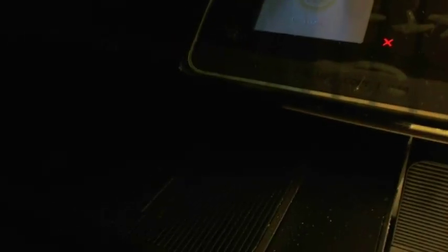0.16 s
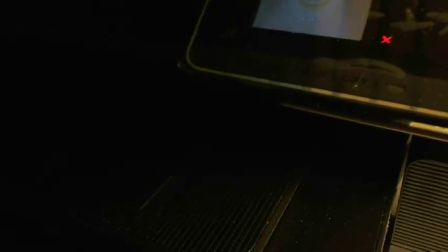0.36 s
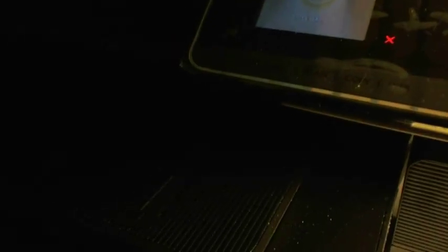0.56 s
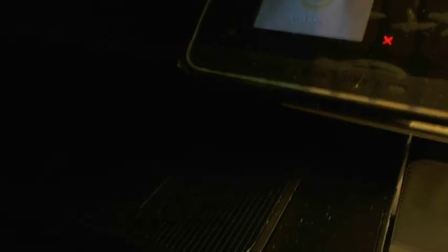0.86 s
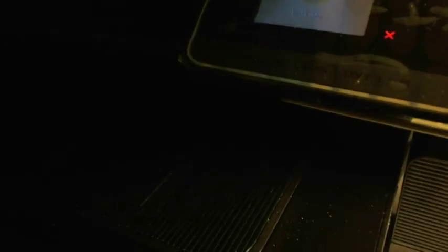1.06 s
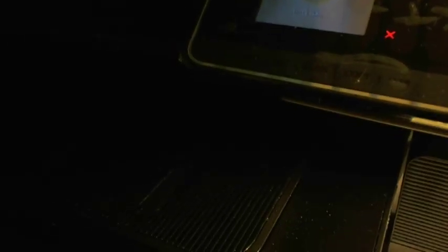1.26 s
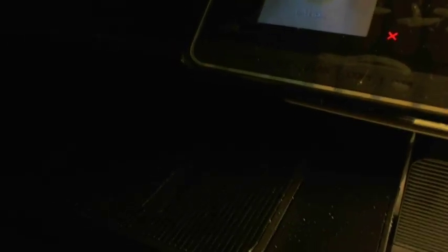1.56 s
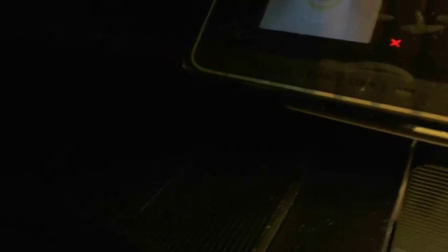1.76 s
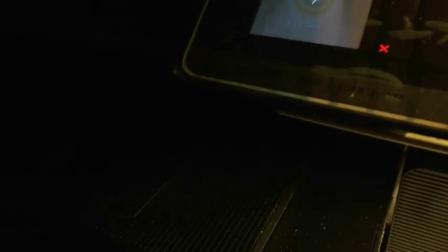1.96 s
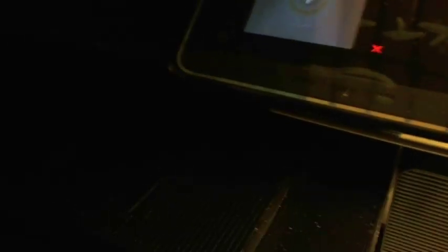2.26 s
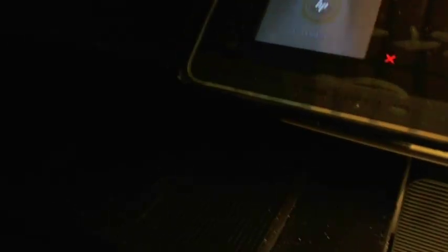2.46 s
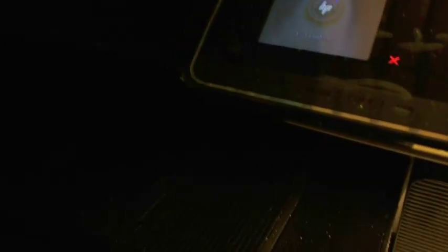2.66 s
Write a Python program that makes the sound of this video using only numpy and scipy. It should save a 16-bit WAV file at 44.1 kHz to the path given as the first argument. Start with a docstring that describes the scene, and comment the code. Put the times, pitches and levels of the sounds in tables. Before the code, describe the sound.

Printer carriage clacks hollowly every three quarters of a second above a steady hum that swells late

```python
"""An inkjet printer in a quiet room, through a narrow-band camera microphone. From the start a motor hums with thin
overtones over the soft rush of the mechanism, and a thin squeal steps up in pitch, gone by 1 s. Ticks near 0.1, 0.8,
1.6 and 2.3 s each lead to a rattling clack of the plastic body some 0.1 to 0.2 s later; sliding noise peaks near 1 s
and a looser part buzzes on. After 2 s the hum swells with its rumble; a short hiss sinks in pitch near 2.7 s.
Sines make the tones, filtered noise the rushes, and random touches and ringing modes the hits."""
import sys
import numpy as np
from scipy import signal
from scipy.fft import rfft, irfft, next_fast_len
from scipy.io import wavfile
from scipy.ndimage import uniform_filter1d, map_coordinates

SR = 44100
rng = np.random.default_rng(int(sys.argv[2]) if len(sys.argv) > 2 else 0)


def persist_wave(psi):
    """Save psi, clipped to +-1, as 16-bit WAV."""
    counts = np.round(np.clip(psi, -1, 1) * 32767).astype(np.int16)
    wavfile.write(sys.argv[1], SR, np.atleast_2d(counts).T)


def voltage_ratio(decibels):
    """Convert decibels (scalar or array-like) to amplitude ratios, 20 dB per decade."""
    exponent = np.asarray(decibels, float) / 20
    return 10 ** exponent


N = 123479


def unit(x):
    """Scale to rms 1."""
    return x / np.sqrt(np.mean(x ** 2) + 1e-20)


def along(points, hz):
    """Read (Hz, value) points on a log frequency axis."""
    point_hz, value = np.transpose(points)
    return np.interp(np.log(hz + 1), np.log(point_hz + 1), value)


def curves(rows):
    """One value per sample for each column after the time."""
    time_s, *columns = np.transpose(rows)
    return [np.interp(np.arange(N) / SR, time_s, column) for column in columns]


def wobble(knots_per_s):
    """A smooth random curve through normal random knots."""
    knots = rng.standard_normal(int(N * knots_per_s / SR) + 4)
    return map_coordinates(knots, [np.arange(N) * knots_per_s / SR])


def filtered(x, response):
    """x times a complex response of frequency."""
    m = next_fast_len(N + SR // 2)
    return irfft(rfft(x, m) * response(np.fft.rfftfreq(m, 1 / SR)), m)[..., :N]


def resonant(x, modes):
    """Parallel resonances of alternating sign, scaled so that white noise of rms 1 stays at rms 1."""
    def response(f):
        total = 0
        for k, (centre, width, db) in enumerate(modes):
            damping = 1j * f * width
            total = total + (-1) ** k * voltage_ratio(db) * damping / (centre ** 2 - f ** 2 + damping + 1e-9)
        return total / np.sqrt(np.mean(np.abs(total) ** 2))
    return filtered(x, response)


def swell(start_s, rise_s, hold_s, t60_s):
    """Envelope: straight rise, hold, exponential fall."""
    t = np.arange(N) / SR - start_s
    fall_s = np.clip(t - rise_s - hold_s, 0, None)
    return np.clip(t / rise_s, 0, 1) * voltage_ratio(-60 * fall_s / t60_s)


def patchy_noise(spectrum, patchy_db):
    """Coloured noise of rms 1 with time-frequency patches of random gain."""
    z = signal.stft(rng.standard_normal(N), nperseg=512)[2]
    field = uniform_filter1d(rng.standard_normal(z.shape), 5, 0)
    field = uniform_filter1d(field, 10, 1)
    noise = signal.istft(z * voltage_ratio(patchy_db * unit(field)), nperseg=512)[1][:N]
    return unit(filtered(noise, lambda hz: voltage_ratio(along(spectrum, hz))))


def narrow(phase, width_hz):
    """Narrow noise of rms 1 around a moving pitch."""
    return unit(wobble(width_hz) * np.sin(phase) + wobble(width_hz) * np.cos(phase))


CONTACTS_PER_S, RATTLES_PER_S, CONTACT_SPREAD_DB = 1500, 5000, 4


def contacts(per_s):
    """Dense random touches of uneven size and either sign, rms 1."""
    touch = rng.random(N) < per_s / SR
    size = voltage_ratio(CONTACT_SPREAD_DB * rng.standard_normal(N))
    return unit(touch * size * rng.choice([-1, 1], N))


def ring(events, modes, rise_s):
    """Single blows ring a set of decaying modes; a harder blow favours the high ones."""
    out, t = np.zeros(N + SR), np.arange(SR // 4) / SR
    middle_octave = np.mean([np.log2(hz) for hz, _, _ in modes])
    onset = (1 - np.exp(-t / rise_s)) ** 2
    for start_s, level_db, hard_db in events:
        tone = 0
        for hz, mode_db, t60_s in modes:
            tilt_db = hard_db * (np.log2(hz) - middle_octave)
            decay = voltage_ratio(mode_db + tilt_db + rng.normal(0, 2.8) - 60 * t / t60_s)
            cycles = hz * rng.normal(1, 0.017) * t
            tone = tone + decay * np.sin(2 * np.pi * (cycles + rng.random()))
        out[round(start_s * SR):][:len(t)] += voltage_ratio(level_db) * tone * onset
    return out[:N]


ROOM_T60_S = 0.24


def room(x):
    """A small room's reverberation: decaying noise of unit energy, silent for the first 4 ms."""
    t = np.arange(SR // 2) / SR
    tail = rng.standard_normal(len(t)) * voltage_ratio(-60 * t / ROOM_T60_S) * (t > .004)
    return signal.fftconvolve(x, tail / np.linalg.norm(tail))[:N]


# Steady spectrum. Each row: frequency in Hz, relative level in dB per Hz.
STEADY_SPECTRUM = [(62, -13.5), (105, -7), (118, -15.5), (150, -12.5), (323, -20.5), (364, -23.5),
                   (657, -23), (708, -18), (762, -27), (1050, -24), (3600, -30.5), (4680, -68),
                   (7920, -120)]
STEADY_DB = -50


def steady_rush():
    """Soft rush of the mechanism: nearly even coloured noise."""
    return voltage_ratio(STEADY_DB) * patchy_noise(STEADY_SPECTRUM, patchy_db=0.14)


# Treble rush. Each row: time in seconds, level in dB.
TREBLE_LEVEL = [(0.0, -56), (0.28, -53), (0.58, -57), (1.0, -56), (1.14, -59.5), (1.31, -68), (2.1, -63.5),
                (2.42, -64.5), (2.52, -55), (2.8, -65.5)]
# Its spectrum. Each row: frequency in Hz, relative level in dB per Hz.
TREBLE_SPECTRUM = [(2000, -4), (2700, 1.5), (3340, -23), (3860, 2.5), (4300, 1), (5000, -9), (5500, -20),
                   (6500, -56.5)]
# Highest treble. Each row: time in seconds, level in dB before TOP_TRIM_DB.
TOP_LEVEL = [(0, -69), (.09, -51.5), (.17, -65.5), (.25, -56), (.3, -62), (.33, -83), (.76, -83),
             (.79, -62.5), (1.05, -60.5), (1.15, -74.5), (1.47, -69), (1.58, -63), (1.7, -72),
             (1.78, -54.5), (1.86, -72.5), (2.26, -72.5), (2.35, -60), (2.47, -69), (2.55, -60),
             (2.67, -69), (2.7, -84), (2.8, -95)]
# Its spectrum. Each row: frequency in Hz, relative level in dB per Hz.
TOP_SPECTRUM = [(3120, -20.5), (5300, 0.5), (5540, -11), (5990, -6), (6610, -18), (7100, -18), (9230, -46),
                (15600, -120)]
TOP_TRIM_DB = -1.5


def treble_rushes():
    """Two patchy noise bands, each following its own level curve."""
    treble = voltage_ratio(curves(TREBLE_LEVEL)[0]) * patchy_noise(TREBLE_SPECTRUM, patchy_db=2.9)
    top = voltage_ratio(curves(TOP_LEVEL)[0] + TOP_TRIM_DB) * patchy_noise(TOP_SPECTRUM, patchy_db=2.5)
    return treble + top


# Sliding carriage. Each row: time in seconds, level in dB before SLIDE_TRIM_DB.
SLIDE_LEVEL = [(0.0, -63), (0.12, -59), (0.82, -51.5), (0.93, -47.5), (1.0, -47.5), (1.24, -68.5),
               (1.47, -71), (1.9, -66.5), (2.1, -70.5), (2.31, -55.5), (2.45, -54), (2.7, -48.5),
               (2.8, -50.5)]
# Rail resonances. Each row: centre in Hz, width in Hz, level in dB per pass.
RAIL_MODES = [(614, 123, -5), (790, 103, 0.5), (933.4, 75, 0.5)]
SLIDE_TRIM_DB = -2.5


def sliding():
    """Carriage friction: noise passed twice through the rail resonances, its level unsteady."""
    level_db = curves(SLIDE_LEVEL)[0] + SLIDE_TRIM_DB + 1.7 * wobble(26)
    once = resonant(rng.standard_normal(N), RAIL_MODES)
    return voltage_ratio(level_db) * unit(resonant(once, RAIL_MODES))


# Short hiss. Each row: time in seconds, centre in Hz, level in dB.
HISS_PATH = [(2.58, 5300, -110), (2.63, 5250, -66), (2.66, 5150, -59), (2.69, 4980, -51),
             (2.725, 4840, -46), (2.76, 4850, -51), (2.8, 4850, -55)]
HISS_WIDTH_HZ = 640


def hiss():
    """A band of noise that sinks in pitch."""
    hz, level_db = curves(HISS_PATH)
    return voltage_ratio(level_db) * narrow(2 * np.pi * np.cumsum(hz) / SR, HISS_WIDTH_HZ)


# Squeal. Each row: time in seconds, pitch in Hz, level in dB.
SQUEAL_PATH = [(0, 4240, -60.5), (.06, 4265, -63.5), (.2, 4245, -57), (.25, 4230, -64.5), (.325, 4260, -50),
               (.365, 4235, -58), (.395, 4470, -51), (.44, 4455, -55), (.455, 4500, -55), (.51, 4507, -55),
               (.53, 4530, -62), (.65, 4550, -62), (.7, 4520, -85), (.76, 4520, -61.5), (.86, 4430, -63),
               (.95, 4430, -87)]
SQUEAL_WIDTH_HZ, SQUEAL_ROUGH_DB = 80, -5


def squeal():
    """A thin tone that steps up in pitch, roughened by narrow noise around it."""
    hz, level_db = curves(SQUEAL_PATH)
    phase = 2 * np.pi * np.cumsum(hz) / SR
    rough = voltage_ratio(SQUEAL_ROUGH_DB) * narrow(phase, SQUEAL_WIDTH_HZ)
    return voltage_ratio(level_db) * unit(np.sin(phase) + rough)


# Motor hum. Each row: time in seconds, level in dB rms.
HUM_LEVEL = [(0.0, -42.5), (0.25, -47.5), (0.29, -44.5), (0.33, -45.5), (0.93, -47.5), (1.43, -45.5),
             (1.67, -48), (1.77, -46.5), (1.81, -49), (1.86, -41.5), (1.94, -44), (2.0, -39), (2.24, -35),
             (2.26, -32), (2.76, -33), (2.8, -31)]
# Thin overtones. Each row: multiple of the shaft rate, level in dB rms.
WHINE_PARTIALS = [(8, -62.5), (12, -67.5), (17, -68.5), (20, -64.5), (24, -71.5), (28, -66)]
# Rumble spectrum. Each row: frequency in Hz, relative level in dB per Hz.
RUMBLE_SPECTRUM = [(12, -65), (20, -26), (54, -9.5), (70, -7), (90, -24.5), (120, -17.5), (230, -29),
                   (300, -64), (510, -120)]
SHAFT_HZ, SHAFT_WAVER = 89.62, .0012  # waver: share of the speed
HUM_WAVER_DB, HUM_ROUGH_DB, WHINE_WAVER_DB = .5, -24, 1.6
RUMBLE_DB, RUMBLE_FOLLOWS = -56, 0.97  # dB of rumble per dB of hum


def motor():
    """Hum at the shaft rate with a rough skirt, thin overtones, and a rumble that grows with the hum."""
    level_db, = curves(HUM_LEVEL)
    phase = 2 * np.pi * np.cumsum(SHAFT_HZ * (1 + SHAFT_WAVER * wobble(2.1))) / SR
    skirt = voltage_ratio(HUM_ROUGH_DB) * (wobble(22) * np.sin(phase) + wobble(24) * np.cos(phase))
    hum = np.sqrt(2) * voltage_ratio(level_db + HUM_WAVER_DB * wobble(5.86)) * (np.sin(phase) + skirt)
    whine = 0
    for multiple, db in WHINE_PARTIALS:
        level = np.sqrt(2) * voltage_ratio(db + WHINE_WAVER_DB * wobble(11.77))
        whine = whine + level * np.sin(multiple * phase)
    rumble_db = RUMBLE_DB + RUMBLE_FOLLOWS * (level_db - level_db.mean()) + 1.18 * wobble(8)
    return hum + whine + voltage_ratio(rumble_db) * patchy_noise(RUMBLE_SPECTRUM, patchy_db=1.7)


# Soft bumps. Each row: start in seconds, level in dB.
BUMP_EVENTS = [(0.0, -46), (0.078, -45), (0.328, -47), (.71, -48.5), (1.409, -54), (1.889, -58),
               (2.208, -50)]
# Thud resonances. Each row: centre in Hz, width in Hz, level in dB.
THUD_MODES = [(292, 86, 1), (463.5, 80, -2)]
BUMP_RISE_S, BUMP_HOLD_S, BUMP_T60_S = 0.004, 0.012, 0.43


def bumps():
    """Soft low knocks inside the case: resonant noise bursts."""
    shape = sum(voltage_ratio(db) * swell(s, BUMP_RISE_S, BUMP_HOLD_S, BUMP_T60_S) for s, db in BUMP_EVENTS)
    return resonant(shape * rng.standard_normal(N), THUD_MODES)


# Ticks. Each row: start in seconds, level in dB, hardness in dB per octave.
TICK_EVENTS = [(.076, -49, -3), (.838, -53, -3), (1.5745, -44, -4), (1.595, -54, 3), (2.341, -47, 0),
               (2.72, -51, -20)]
# Tick modes. Each row: frequency in Hz, level in dB, t60 in seconds.
CLICK_MODES = [(3600, -1, .035), (5400, -1, .04), (6200, -2, .04)]
# Scraping pawl. Each row: centre in Hz, width in Hz, level in dB.
PAWL_MODES = [(1600, 300, 5), (3900, 170, -4), (6260, 1000, -9.5)]
TICK_TAIL_DB, TICK_TAIL_T60_S = -18, 0.23


def ticks():
    """A short ringing tick with a faint scraping tail of dense touches."""
    tail = sum(voltage_ratio(db + TICK_TAIL_DB) * swell(s, .012, .022, TICK_TAIL_T60_S) for s, db, _ in TICK_EVENTS)
    scrape = resonant(tail * contacts(RATTLES_PER_S), PAWL_MODES)
    return ring(TICK_EVENTS, CLICK_MODES, rise_s=.0015) + scrape


# Looser part. Each row: start in seconds, level in dB, t60 in seconds.
BUZZ_EVENTS = [(1.061, -44.5, 0.38)]
# Its resonance. Each row: centre in Hz, width in Hz, level in dB.
FLAP_MODES = [(614, 120, 0)]


def buzz():
    """A loose flap buzzes on after a clack: touches through its resonance."""
    shape = sum(voltage_ratio(db) * swell(s, 0.0026, 0.0045, t60) for s, db, t60 in BUZZ_EVENTS)
    return resonant(shape * contacts(CONTACTS_PER_S), FLAP_MODES)


# Knocks inside the clacks. Each row: start in seconds, level in dB before KNOCK_TRIM_DB, hardness in dB per octave.
KNOCK_EVENTS = [(.222, -30, 0), (.243, -28, 0), (.981, -35, -2), (.989, -32, -4), (.997, -31, 1),
                (1.015, -30, 0), (1.042, -32, -3), (1.751, -38, -4), (1.758, -26, 1), (1.769, -27, 1),
                (1.777, -30, -2), (2.516, -33, -7), (2.544, -31, 4), (2.561, -32, -1), (2.582, -34, -4)]
# Lid modes. Each row: frequency in Hz, level in dB, t60 in seconds.
LID_MODES = [(295, -1, .12), (370, -3, .1), (470, -6, .08), (727, -3, .08), (1350, -2, .055),
             (1480, -7, .04)]
KNOCK_TRIM_DB = -6


def knocks():
    """Hollow blows ring the modes of the lid."""
    return voltage_ratio(KNOCK_TRIM_DB) * ring(KNOCK_EVENTS, LID_MODES, rise_s=.0009)


# Clacks. Each row: start in seconds, level in dB, rise in seconds, hold in seconds, t60 in seconds.
CLACK_EVENTS = [(0.199, -35, 0.028, 0.022, 0.12), (0.965, -35.5, 0.037, 0.015, 0.25),
                (1.739, -35.5, 0.011, 0.036, 0.23), (2.511, -34, 0.025, 0.0089, 0.3)]
# Plastic body. Each row: centre in Hz, width in Hz, level in dB.
BODY_MODES = [(269.4, 69, 3.5), (432, 255, -3.5), (716, 143, -2.5), (986, 183, -7.5), (1323, 94, -4),
              (1726, 84, -9.5)]
# Small bright parts. Each row: centre in Hz, width in Hz, level in dB.
PART_MODES = [(2103, 280, -8.5), (2515, 130, -0.5), (2950, 450, -4), (3736, 490, -5), (4350, 640, -10.5),
              (6440, 550, -22)]
RATTLE_LAG_S, RATTLE_DB = 0.0079, -11.5


def clacks():
    """A burst of touches shakes the body; small bright parts rattle a moment later."""
    body, parts = 0, 0
    for start_s, db, *shape_s in CLACK_EVENTS:
        body = body + voltage_ratio(db) * swell(start_s, *shape_s)
        parts = parts + voltage_ratio(db + RATTLE_DB) * swell(start_s + RATTLE_LAG_S, *shape_s)
    shaken = resonant(body * contacts(CONTACTS_PER_S), BODY_MODES)
    return shaken + resonant(parts * contacts(RATTLES_PER_S), PART_MODES)


CASE_LOW_HZ, ROOM_DB = 140, -8.5  # the case radiates little below


def scene():
    """The printer in its room; only the hits pass the case and excite the room."""
    hits = clacks() + knocks() + buzz() + ticks() + bumps()
    hits = filtered(hits, lambda hz: (1j * hz / (CASE_LOW_HZ + 1j * hz)) ** 4)
    tones = motor() + squeal()
    noises = hiss() + sliding() + treble_rushes() + steady_rush()
    return (hits + voltage_ratio(ROOM_DB) * room(hits) + tones + noises)[None]


def top_cut(x):
    """Nothing passes above the cut-off."""
    return signal.sosfilt(signal.butter(12, 15750, fs=SR, output="sos"), x)


# Leak of the mirrored band. Each row: frequency in Hz, gain in dB.
MIRROR_LEAK = [(8000, -26.5), (10000, -29), (12000, -33.5), (14000, -55.5), (15700, -73)]
EDGE_HZ, MIRROR_HZ, SELF_NOISE_DB = 7200, 16000, -88


def record(dry):
    """A narrow band; raising the sample rate leaves a faint mirror of it above; a little self noise."""
    band = filtered(dry, lambda hz: 1 / np.sqrt(1 + (hz / EDGE_HZ) ** 60))
    flipped = 2 * band * np.cos(2 * np.pi * MIRROR_HZ * np.arange(N) / SR)
    mirror = filtered(flipped, lambda hz: voltage_ratio(along(MIRROR_LEAK, hz)) * (hz < MIRROR_HZ))
    self_noise = voltage_ratio(SELF_NOISE_DB) * rng.standard_normal(dry.shape)
    return top_cut(band + mirror + self_noise)


dry = scene()
out = record(dry)
persist_wave(out)
```